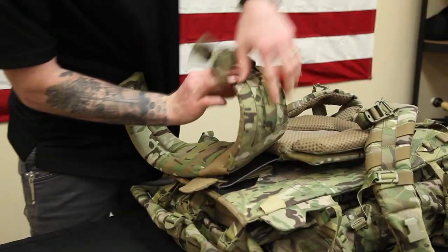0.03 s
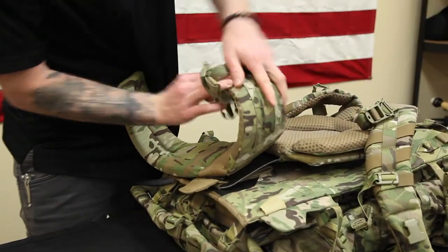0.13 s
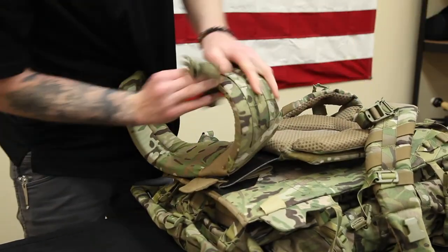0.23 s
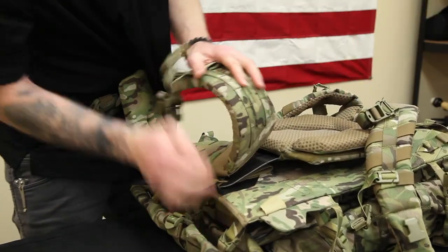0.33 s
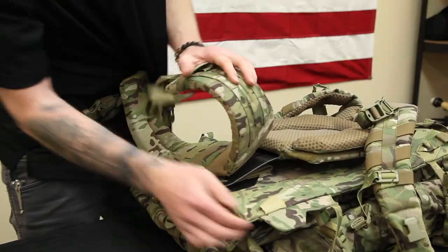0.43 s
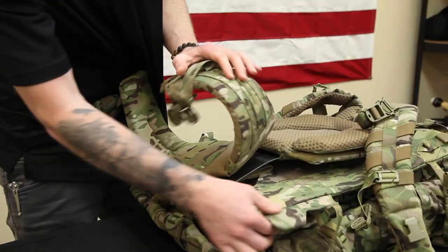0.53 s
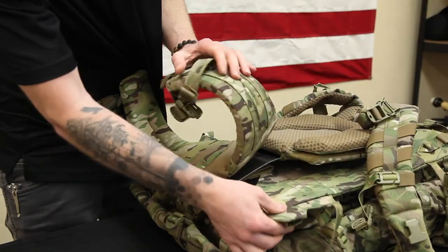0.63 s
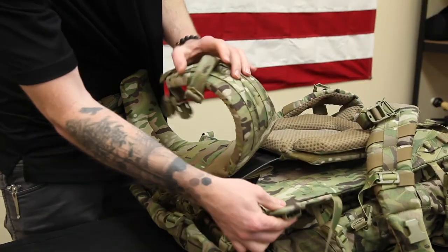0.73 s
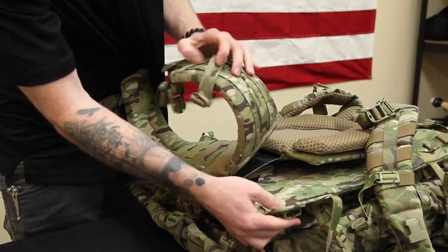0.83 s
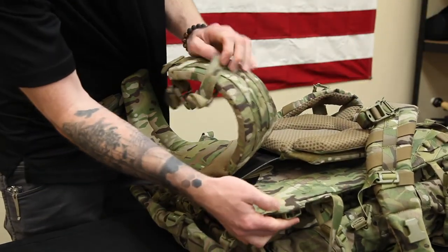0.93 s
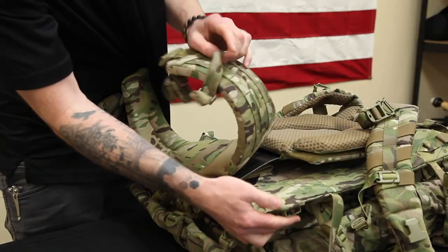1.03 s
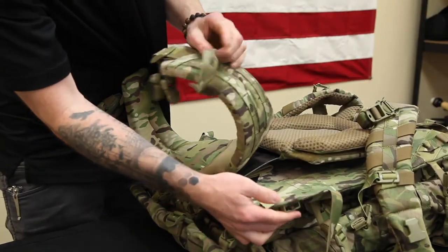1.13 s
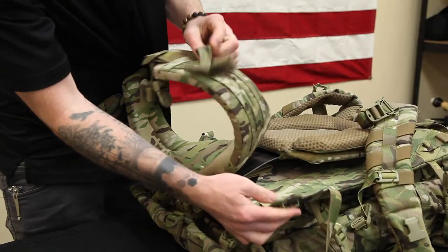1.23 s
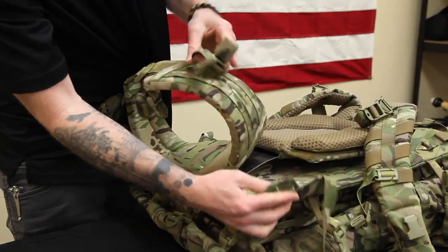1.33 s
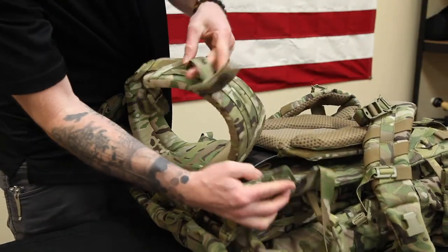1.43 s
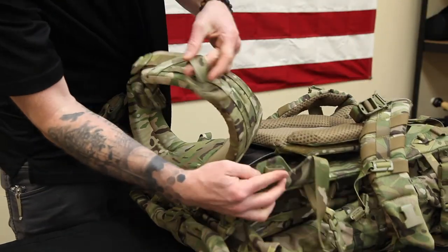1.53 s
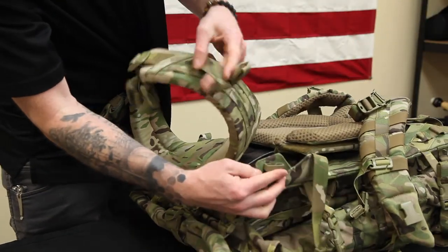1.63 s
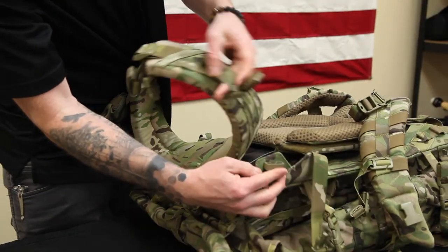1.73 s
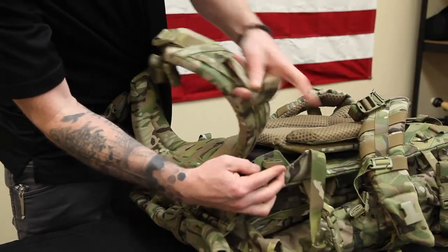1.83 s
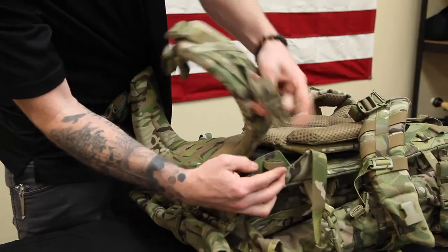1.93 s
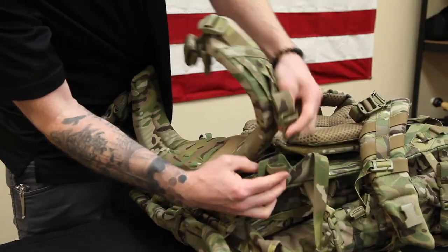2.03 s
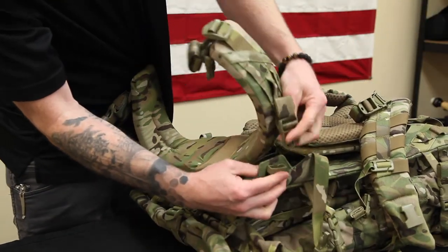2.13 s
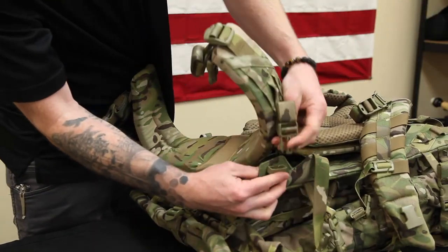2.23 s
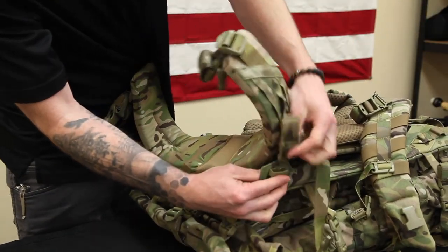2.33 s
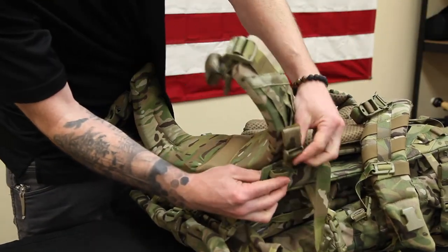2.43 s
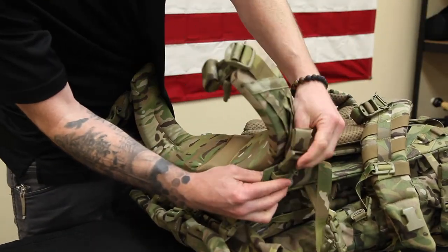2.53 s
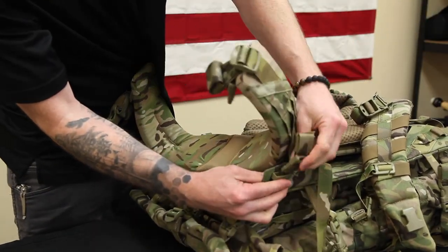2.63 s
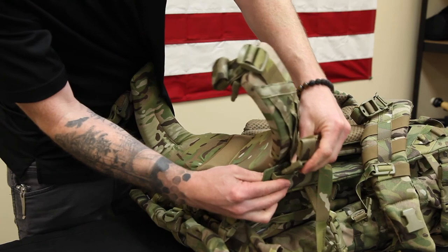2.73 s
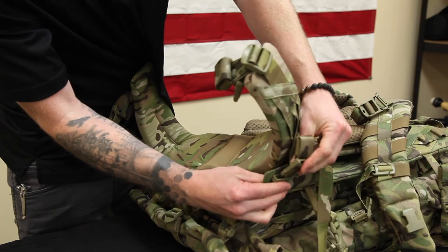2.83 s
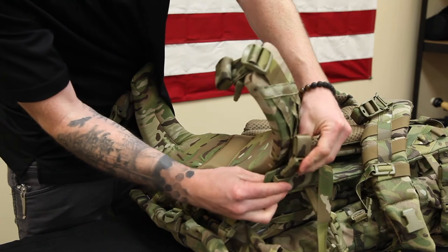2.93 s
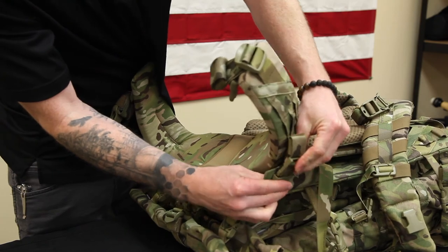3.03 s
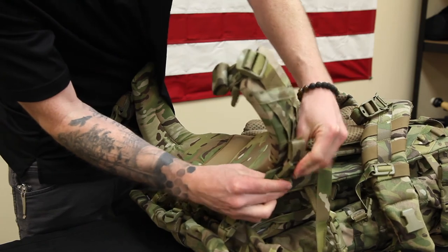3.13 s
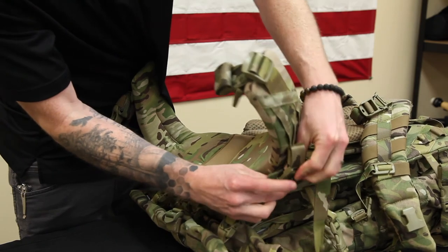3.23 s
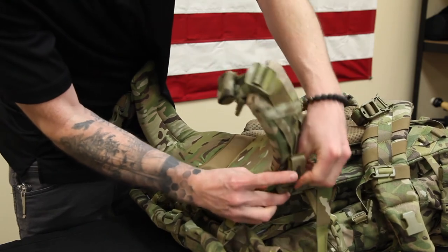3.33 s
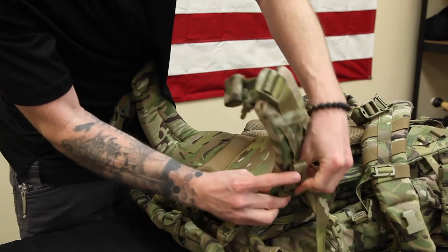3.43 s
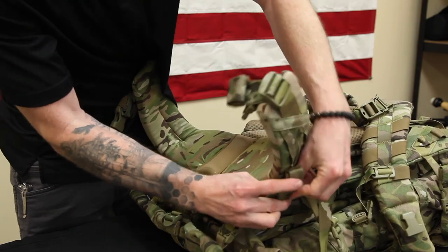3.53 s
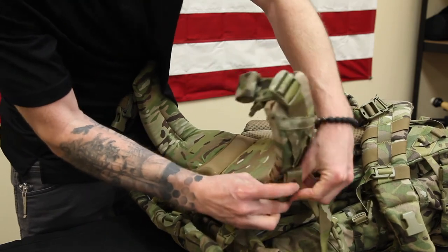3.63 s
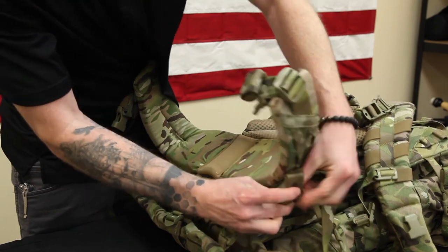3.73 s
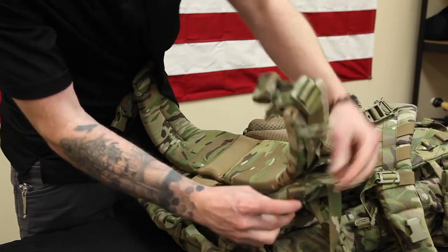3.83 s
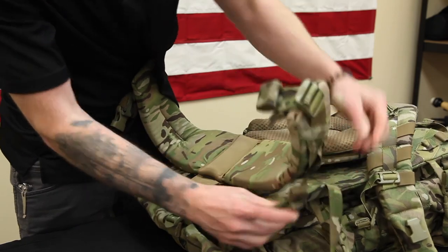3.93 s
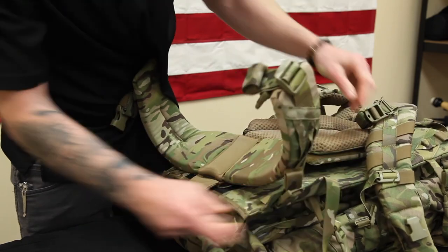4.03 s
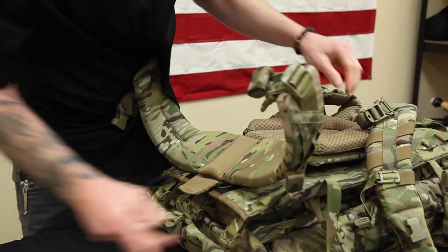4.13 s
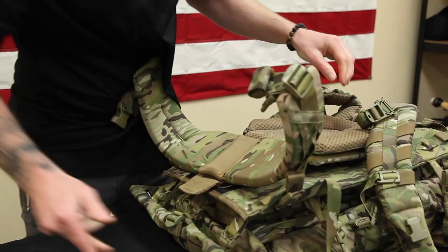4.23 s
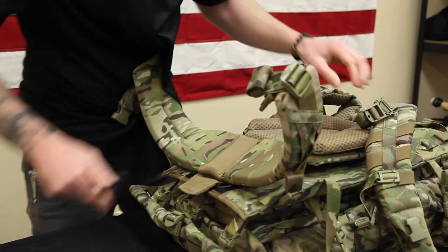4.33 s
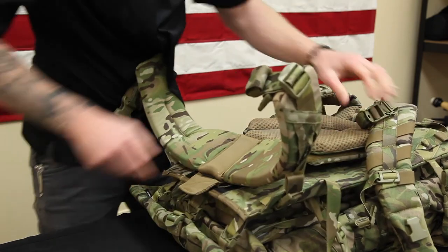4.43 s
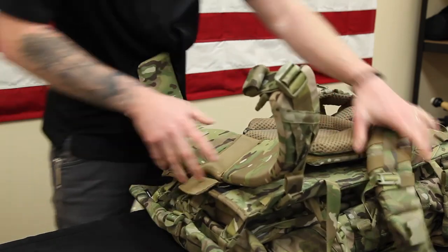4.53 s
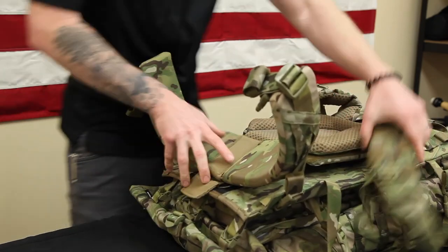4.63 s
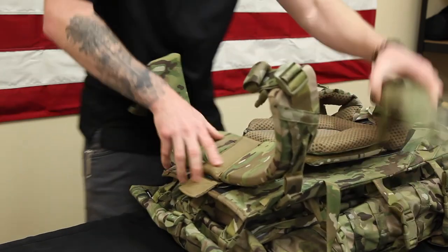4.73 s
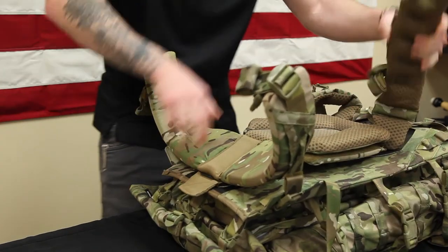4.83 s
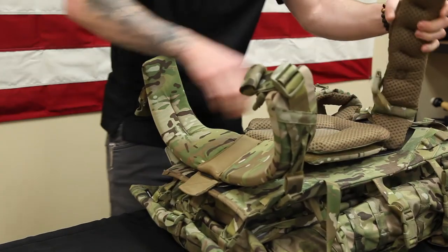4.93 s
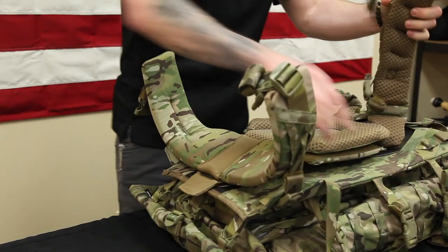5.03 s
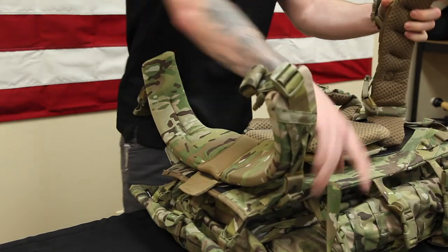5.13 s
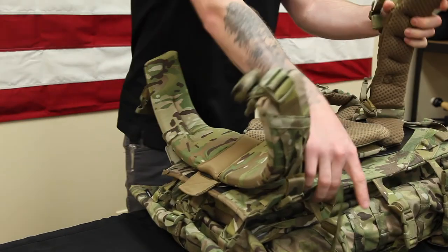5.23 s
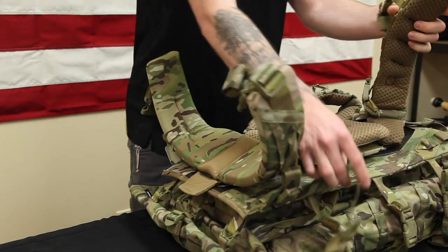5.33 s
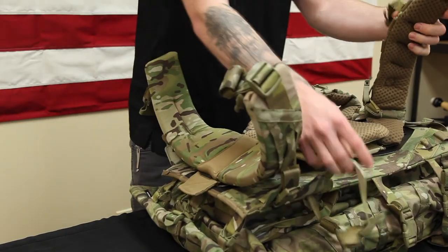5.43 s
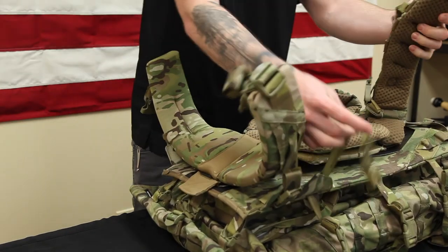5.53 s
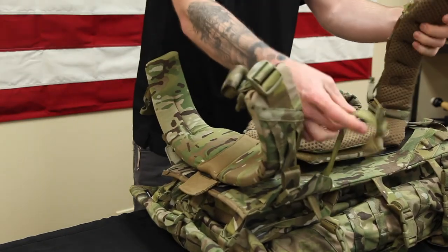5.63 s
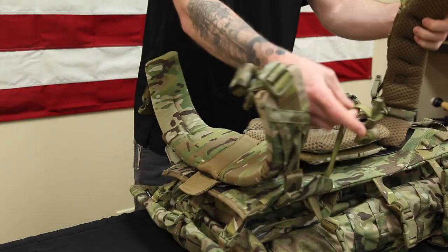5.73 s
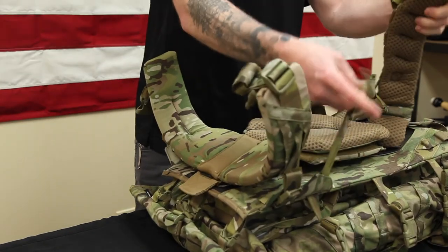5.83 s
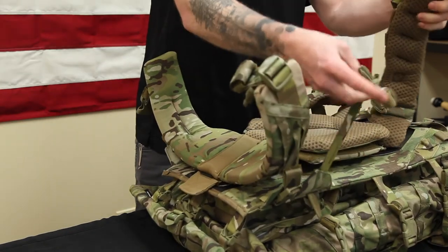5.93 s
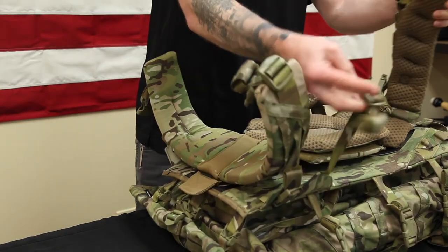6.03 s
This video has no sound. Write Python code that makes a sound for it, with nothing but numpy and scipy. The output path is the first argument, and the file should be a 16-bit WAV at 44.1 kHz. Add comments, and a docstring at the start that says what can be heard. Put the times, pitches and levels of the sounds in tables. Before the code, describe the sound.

Hands rub and pat stiff nylon webbing, plastic buckle halves tick together, then snap shut with a sharp crack ringing in a small room.

```python
"""From the start, hands rub, scuff and pat a padded nylon vest on a table: shaped noise, over a faint machine hum.
From 1.5 s the halves of a plastic side-release buckle tap together: damped modes struck by tiny scrapes.
At 3.65 s they snap shut: a cluster of cracks and free modes that sets the small room ringing.
At 4.6 s a hand catches the stiff shoulder strap, and at 5.36 s a strap slider clicks: modes under noise cracks."""
import sys
import numpy as np
from scipy import signal
from scipy.fft import rfft, irfft, next_fast_len
from scipy.io import wavfile
from scipy.ndimage import map_coordinates

SR = 44100
rng = np.random.default_rng(int(sys.argv[2]) if len(sys.argv) > 2 else 0)


def unload_wav(signal):
    """Save mono or channel-first audio to the path in sys.argv[1] as 16-bit WAV at rate SR, clipped to [-1, 1]."""
    wavfile.write(
        sys.argv[1],
        SR,
        np.round(np.clip(np.atleast_2d(signal).T, -1, 1) * 32767).astype(np.int16),
    )


N = 268039  # samples


def amp(db):
    """Linear gain of a level in dB."""
    return 10 ** (np.asarray(db) / 20)


def unit(x):
    """x at rms 1."""
    return x / np.sqrt(np.mean(x ** 2) + 1e-20)


def along(points, hz):
    """Read (frequency, value) points at hz, on a log frequency axis."""
    f, v = np.transpose(points)
    return np.interp(np.log(hz + 1), np.log(f + 1), v)


def curves(rows):
    """One value per sample for each column after the time."""
    s, *cols = np.transpose(rows)
    return [np.interp(np.arange(N) / SR, s, c) for c in cols]


def wobble(rate):
    """A smooth random curve, rate knots a second."""
    knots = rng.standard_normal(int(N * rate / SR) + 4)
    return map_coordinates(knots, [np.arange(N) * rate / SR])


def filtered(x, response):
    """x times a response of frequency."""
    m = next_fast_len(len(x) + SR // 2)
    spectrum = rfft(x, m) * response(np.fft.rfftfreq(m, 1 / SR))
    return irfft(spectrum, m)[:len(x)]


def coloured(x, spectrum):
    """x through a (frequency, level) curve, at rms 1."""
    return unit(filtered(x, lambda hz: amp(along(spectrum, hz))))


def fade(t60):
    """A quarter second of exponential decay, falling 60 dB in t60 seconds."""
    return np.exp(-np.log(1000) * np.arange(SR // 4) / SR / t60)


def burst(t60):
    """Dying noise."""
    return fade(t60) * rng.standard_normal(SR // 4)


def band(x, hz, spread):
    """A causal band-pass from hz / spread to hz * spread."""
    sos = signal.butter(1, [hz / spread, hz * spread], 'band', fs=SR, output='sos')
    return signal.sosfilt(sos, x)


def twice_banded(x, hz, spread):
    """The same band-pass twice, for steeper skirts."""
    return band(band(x, hz, spread), hz, spread)


def add(track, s, db, sound):
    """Lay a sound on the track at time s with a given peak."""
    part = track[round(s * SR):][:len(sound)]
    part += amp(db) * sound[:len(part)] / np.abs(sound).max()


def patches(x, depth_db, width_size, length_size):
    """Uneven colour: random gains, smooth over frequency and time."""
    z = signal.stft(x, nperseg=1024)[2]
    smoother = np.outer(np.hanning(width_size), np.hanning(length_size))
    field = signal.fftconvolve(rng.standard_normal(z.shape), smoother, 'same')
    return signal.istft(z * amp(depth_db * unit(field)), nperseg=1024)[1][:len(x)]


def ring(modes, scatter_db):
    """One blow: every mode starts at a slightly new strength, with alternating polarity."""
    t = np.arange(SR // 4) / SR
    out = np.zeros(len(t))
    for k, (hz, db, t60) in enumerate(modes):
        strength = amp(db + scatter_db * rng.standard_normal())
        out += (-1) ** k * strength * fade(t60) * np.sin(2 * np.pi * hz * t)
    return out


def blows(contacts, modes, crack_db, crack_t60):
    """Hard contacts: a brief noise crack on top of the part's modes."""
    out = np.zeros(N)
    for s, db, hz in contacts:
        crack = twice_banded(burst(crack_t60), hz, spread=2.3)
        add(out, s, db, ring(modes, scatter_db=1.5) + amp(crack_db) * crack)
    return out


# colour of the ventilation noise: (frequency [Hz], relative level [dB per Hz])
VENTILATION_COLOUR = [(20, -8.5), (38, -6), (55, 4.5), (90, 4.5), (160, 3), (300, -1), (700, -17.5),
                      (2000, -26), (6000, -24.5), (16000, -34)]
# a distant motor: (time [s], frequency [Hz], rms level before its wobble [dB])
MOTOR_RUN = [(0, 61.6, -82.5), (1.8, 65.9, -88), (2.6, 67.85, -73.5), (3.4, 70.8, -71.5), (4.8, 72.56, -73),
             (6.08, 69.9, -79)]
# steady hum: (frequency [Hz], rms level [dB])
HUM_TONES = [(53.8, -76.5), (120, -84.5)]


def background():
    """Ventilation noise, hum tones with a slight phase drift, and a motor that speeds up, then eases back."""
    hz, db = curves(MOTOR_RUN)
    motor = amp(db + wobble(3.0)) * unit(np.sin(2 * np.pi * np.cumsum(hz) / SR))
    hum = np.zeros(N)
    for f, level in HUM_TONES:
        phase = 2 * np.pi * f * np.arange(N) / SR + 0.16 * wobble(2.5)
        hum += amp(level) * unit(np.sin(phase))
    air = amp(-73.0) * coloured(rng.standard_normal(N), VENTILATION_COLOUR)
    return motor + hum + air


# first echoes off the table and walls: (delay [s], level [dB])
FIRST_ECHOES = [(.0066, -17.5), (0.0141, -21), (0.0161, -13.5), (.0406, -18.5)]
WALL_HZ = 7550  # the walls return little above this


def echoed(x):
    """Direct sound and its duller first echoes off the table and walls."""
    dull = signal.sosfilt(signal.butter(2, WALL_HZ, fs=SR, output='sos'), x)
    return x + sum(amp(db) * np.pad(dull, (round(delay * SR), 0))[:N] for delay, db in FIRST_ECHOES)


# time the room takes to fall 60 dB: (frequency [Hz], decay time [s])
ROOM_DECAY = [(200, 0.87), (800, 0.35), (2700, 0.41), (4500, 0.4), (6100, .41), (10000, .31), (15000, 0.21)]


def tail(colour):
    """The room's diffuse answer at energy 1: some resonances stand out, and treble dies sooner than bass."""
    diffuse = patches(rng.standard_normal(SR * 3 // 4), depth_db=2.3, width_size=5, length_size=41)
    hz, t, z = signal.stft(diffuse, SR, nperseg=256)
    falloff = np.exp(-np.log(1000) * t / along(ROOM_DECAY, hz)[:, None])
    decay = signal.istft(z * falloff, SR, nperseg=256)[1]
    onset = 1 - np.exp(-np.arange(len(decay)) / SR / 0.0016)
    answer = coloured(decay, colour) * onset
    return answer / np.linalg.norm(answer)


# colour of the tail behind the small sounds: (frequency [Hz], relative level [dB])
TAIL_COLOUR = [(150, 7), (400, 8), (1000, 2), (2200, -2), (3300, -1), (6000, -8), (8500, -8), (15000, -2.5)]


def room(x, wet_db):
    """A small sound with its echoes and tail."""
    return echoed(x) + amp(wet_db) * signal.fftconvolve(x, tail(TAIL_COLOUR))[:N]


CRINKLES_PER_S, CRINKLE_HZ = 170, 1993  # mean rate, band centre


def crinkles():
    """Stiff fibres let go: tiny ticks of uneven size at random moments, at rms 1."""
    ticks = (rng.random(N) < CRINKLES_PER_S / SR) * rng.standard_normal(N)
    rasp = signal.fftconvolve(ticks, burst(.0012))[:N]
    return unit(band(rasp, CRINKLE_HZ, spread=5.4))


def swell(s, width):
    """A slide gathers speed and stops again: a Gaussian level curve, highest at time s."""
    return np.exp(-.5 * ((np.arange(N) / SR - s) / width) ** 2)


# how hard the cloth is worked while the strap is threaded: (time [s], level [dB])
THREADING_EFFORT = [(0.0, -68), (0.51, -67), (0.73, -76.5), (0.93, -73.5), (1.08, -70.5), (1.92, -77.5),
                    (2.05, -72.5), (2.72, -80.5), (2.88, -82), (3.6, -74.5)]
# and afterwards, as the hands reach across the vest: (time [s], level [dB])
REACHING_EFFORT = [(4.0, -72), (4.65, -74), (4.77, -70), (4.92, -69.5), (5.02, -71.5), (6.08, -74)]
# colour of webbing rubbing on cloth: (frequency [Hz], relative level [dB per Hz])
RUB_COLOUR = [(100, -26.5), (250, -3.5), (550, 2.5), (1150, -1), (2000, -5), (3500, -6), (8000, -25.5),
              (16000, -43)]
# colour of the hissing fibres: (frequency [Hz], relative level [dB per Hz])
FIBRE_COLOUR = [(500, -25), (1500, -4), (3500, -3.5), (6500, -3), (11000, -9), (15500, -4.5)]
# webbing slides over webbing, also played by scuffs():
# (time [s], scuff rms at its height [dB], Gaussian width [s], band centre [Hz], fibre hiss rms at its height [dB])
SLIDES = [(0.047, -70, 0.015, 1200, -67), (0.156, -68, 0.014, 1800, -62.5),
          (.32, -62.5, 0.029, 1230, -58.5), (.53, -70, 0.032, 900, -68.5), (0.661, -69, 0.056, 1450, -64.5),
          (0.867, -78, 0.023, 2500, -68.5), (1.005, -68.5, 0.024, 1280, -63.5),
          (1.106, -59, .015, 1770, -67), (1.289, -77, 0.012, 2500, -66.5), (1.417, -74, 0.033, 880, -69.5),
          (1.596, -70.5, 0.067, 700, -72.5), (1.704, -84, 0.041, 2500, -72), (1.886, -81, 0.028, 5000, -68),
          (1.98, -65.5, 0.029, 5170, -62.5), (2.071, -58, 0.016, 4530, -64.5),
          (2.291, -88, 0.0062, 2500, -72.5), (2.419, -70, 0.023, 1500, -65.5),
          (3.217, -64, 0.02, 490, -71.5), (3.305, -78.5, 0.038, 695, -73), (3.629, -66, 0.0072, 5000, -70),
          (3.87, -69, .018, 7840, -61), (4.066, -71.5, 0.0194, 1800, -83), (4.258, -74.5, 0.066, 3360, -90),
          (4.706, -67, 0.034, 980, -68.5), (4.827, -64, 0.028, 1240, -61), (4.93, -67, 0.029, 2990, -69.5),
          (5.096, -67.5, .03, 1540, -72), (5.312, -71, 0.048, 2470, -63), (5.62, -73, 0.045, 993, -67),
          (5.929, -74.5, 0.026, 1190, -67.5)]
HISS_DB, CRINKLE_DB = -2, -11  # hiss against the effort level, crinkles against the hiss


def cloth():
    """Webbing rubs in small slips, coloured by shifting folds; fibres hiss and crinkle, most during a slide."""
    work_db, = curves(THREADING_EFFORT + REACHING_EFFORT)
    work = amp(work_db + 1.1 * wobble(9.6))
    slips = wobble(70)
    folds = patches(rng.standard_normal(N), depth_db=2.5, width_size=7, length_size=51)
    rub = coloured(folds * amp(1.3 * slips), RUB_COLOUR)
    weave = patches(rng.standard_normal(N), depth_db=1.2, width_size=22, length_size=18)
    fibres = coloured(weave * amp(0.6 * slips + 2.2 * wobble(970)), FIBRE_COLOUR)
    slide_power = sum((amp(hiss_db) * swell(s, width)) ** 2 for s, _, width, _, hiss_db in SLIDES)
    hiss_level = np.sqrt((amp(HISS_DB) * work) ** 2 + slide_power)
    return work * rub + hiss_level * (fibres + amp(CRINKLE_DB) * crinkles())


def scuffs():
    """Each quick slide swells and fades, rough with the ribs of the webbing."""
    grain = rng.standard_normal(N) * amp(1.3 * wobble(260) + 2.9 * wobble(1400))
    out = np.zeros(N)
    for s, db, width, hz, _ in SLIDES:
        out += amp(db) * swell(s, width) * unit(band(grain, hz, spread=1.64))
    return out


# dull bumps of the padded vest, and at 2.434 s the low body under the buckle's loud tap: (time [s], peak level
# [dB], band centre [Hz], t60 [s])
DULL_BUMPS = [(1.609, -60.5, 208, 0.054), (2.434, -52.5, 690, 0.23), (2.705, -60.5, 474, .09),
              (2.796, -60.5, 467, 0.13), (3.242, -51.5, 430, 0.06), (3.912, -54, 168, 0.14),
              (4.602, -51.5, 1050, 0.15), (4.69, -58.5, 258, 0.39), (4.804, -53, 325, 0.078),
              (5.203, -58.5, 270, 0.047), (5.66, -59, 600, .1), (5.912, -59, 293, 0.055)]


def bumps():
    """Each bump is a low, narrow band of dying noise; on the vest, padding swallows the treble."""
    out = np.zeros(N)
    for s, db, hz, t60 in DULL_BUMPS:
        add(out, s, db, twice_banded(burst(t60), hz, spread=1.35))
    return out


# fingertips pat the webbing: (time [s], peak level [dB], band centre [Hz])
FINGER_PATS = [(.138, -55.5, 1300), (1.092, -51.5, 1383), (1.52, -54, 1300), (2.211, -55, 1090),
               (2.548, -55, 1410), (2.689, -59.5, 940), (2.710, -60.5, 2000), (3.079, -51.5, 1200),
               (3.173, -57.5, 1696), (3.191, -52, 2200), (5.019, -53, 1140), (5.198, -51, 1400)]


def pats():
    """Fingertips land on the webbing: a short rasp without any ring."""
    out = np.zeros(N)
    for s, db, hz in FINGER_PATS:
        add(out, s, db, twice_banded(burst(.058), hz, spread=2.5))
    return out


# a hand catches the stiff shoulder strap: (time [s], peak level [dB], crack band centre [Hz])
STRAP_GRABS = [(4.5995, -45.5, 1800), (4.614, -54, 1600)]
# strap stiffener modes: (frequency [Hz], relative level [dB], t60 [s])
STIFFENER_MODES = [(510, -7, 0.014), (899, -3.5, 0.033), (990, -1.5, 0.025), (1800, 0, 0.029)]


def strap_grab():
    """The caught strap rings its stiffener's low modes under a soft noise crack."""
    return blows(STRAP_GRABS, STIFFENER_MODES, crack_db=1, crack_t60=0.039)


# the slider rattles on its strap: (time [s], peak level [dB], crack band centre [Hz])
SLIDER_CLICKS = [(5.360, -45, 5500), (5.3626, -26, 5730), (5.3665, -28, 6500), (5.3682, -35, 5420)]
# slider modes: (frequency [Hz], relative level [dB], t60 [s])
SLIDER_MODES = [(1660, -24, 0.016), (3200, -17, 0.0038), (4670, -1.5, 0.0066), (5750, 1.5, 0.005),
                (7320, 1, 0.0034), (8884, 0, 0.0063), (12010, -5, 0.003)]


def slider_rattle():
    """A few contacts within milliseconds ring the slider's short, high modes."""
    return blows(SLIDER_CLICKS, SLIDER_MODES, crack_db=4, crack_t60=0.016)


# the hand-held buckle halves tick together: (time [s], peak level [dB], band centre [Hz], scrape t60 [s])
BUCKLE_TAPS = [(1.5192, -38, 6300, 0.026), (1.535, -52, 2800, .014), (1.570, -46.5, 5000, 0.015),
               (2.2102, -51, 5500, 0.021), (2.4331, -30.5, 1900, .0021), (2.78, -35.5, 3300, .0024),
               (2.870, -56, 2500, .02), (4.5995, -48, 7000, 0.089), (4.900, -46, 8500, .011),
               (5.439, -50, 3500, 0.012), (5.827, -47, 2600, .012)]
# buckle modes, also rung by snap(): (frequency [Hz], relative level [dB], t60 when free [s])
BUCKLE_MODES = [(870, -19.5, 0.0077), (1450, -23, 0.0097), (2360, -4.5, 0.0053), (2820, -9, 0.018),
                (3800, -17, 0.0074), (5800, -4, 0.0038), (6400, -7, 0.0046), (7940, -4.5, 0.0028),
                (10000, -12.5, 0.004), (13400, -17, 0.0027), (15600, -11, .005)]
GRIP_DAMPING, TAP_RING_DB = 0.34, 10  # share of the ring time that the fingers leave; ring over the tick


def taps():
    """A touch and a brief scrape ring the buckle's modes, which the fingers damp to a shorter ring."""
    out, t = np.zeros(N), np.arange(SR // 4) / SR
    held = sum(amp(db) * fade(t60 * GRIP_DAMPING) * np.cos(2 * np.pi * hz * t)
               for hz, db, t60 in BUCKLE_MODES)
    for s, db, hz, scrape_t60 in BUCKLE_TAPS:
        contact = amp(-16.5) * burst(scrape_t60)
        contact[0] += 1  # the touch itself
        tick = twice_banded(contact, hz, spread=2.3)
        rung = signal.fftconvolve(tick, held)[:len(t)]
        add(out, s, db, unit(tick) + amp(TAP_RING_DB) * unit(rung))
    return out


# the prongs spring out, then settle against the socket:
# (time [s], peak level before the direct path's filter and gain [dB], crack band centre [Hz])
PRONG_CONTACTS = [(3.6456, -16, 4500), (3.6464, -9.5, 8000), (3.6467, -11, 8900), (3.6474, -10, 5700),
                  (3.6483, -13, 3500)]
# the snap as it spreads in all directions into the room: (frequency [Hz], relative level [dB per Hz])
SPREAD_COLOUR = [(100, -29.5), (300, -17.5), (550, -12.5), (1080, -4), (1700, -10), (2300, -3.5),
                 (2830, -0.5), (3150, -7), (3700, -1.5), (4400, -9.5), (5100, -11), (6000, 1),
                 (7600, -11.5), (9900, -8), (12400, -12), (15500, -9.5)]
# narrow resonances that linger after the snap: (frequency [Hz], relative level [dB], t60 [s])
LINGERING_TONES = [(964, -4.5, .45), (1114, -8, 0.53), (1284, -13, 0.64), (2280, -3, 0.61), (2524, -3, .38),
                   (2850, 0.5, 0.48), (6000, 1, .48), (6300, -3, .42), (6600, 0.5, 0.38)]
SMALL_PART_HZ = 250  # the buckle is too small to radiate much below this


def snap():
    """The prongs crack home within a few milliseconds and set the whole room ringing."""
    prongs = blows(PRONG_CONTACTS, BUCKLE_MODES, crack_db=5.0, crack_t60=0.0027)
    radiation = signal.butter(2, SMALL_PART_HZ, 'high', fs=SR, output='sos')
    direct = amp(0.16) * signal.sosfilt(radiation, prongs)
    diffuse = tail(SPREAD_COLOUR)
    t = np.arange(len(diffuse)) / SR
    tones = np.zeros(len(t))
    for hz, db, t60 in LINGERING_TONES:
        decay = np.exp(-np.log(1000) * t / t60)
        tones += amp(db) * decay * np.sin(2 * np.pi * (hz * t + rng.random()))
    reverberation = diffuse + amp(-48) * tones
    start = round(PRONG_CONTACTS[0][0] * SR)  # the room answers from the first contact
    return echoed(direct) + np.pad(reverberation, (start, N))[:N]


def scene():
    """Hum, cloth, straps and buckle in the room, as one channel."""
    handling = room(scuffs(), wet_db=-7.5) + room(bumps(), wet_db=-18.0) + room(pats(), wet_db=-6)
    strap = room(strap_grab(), wet_db=1)
    slider = room(slider_rattle(), wet_db=-2.5)
    buckle = room(taps(), wet_db=-4) + snap()
    return (background() + cloth() + handling + strap + slider + buckle)[None]


TOP_HZ = 15900  # upper band limit


def record(dry):
    """A very steep low-pass leaves almost nothing above the band limit."""
    return filtered(dry[0], lambda hz: 1 / (1 + (hz / TOP_HZ) ** 160))[None]


dry = scene()
out = record(dry)
unload_wav(out)
```